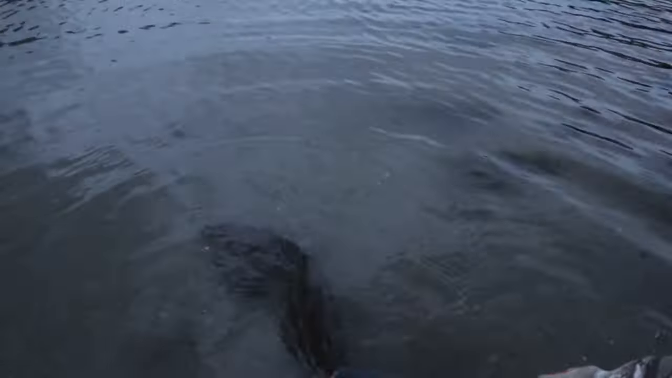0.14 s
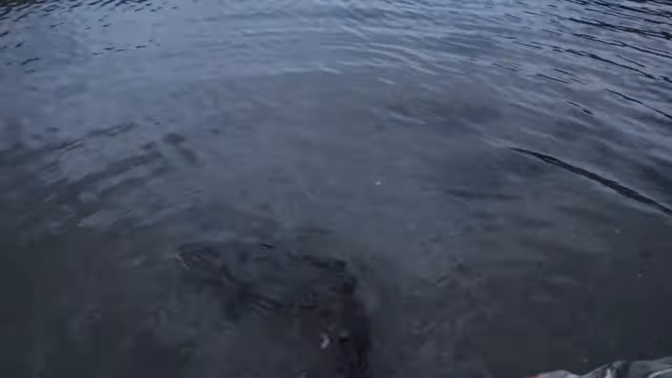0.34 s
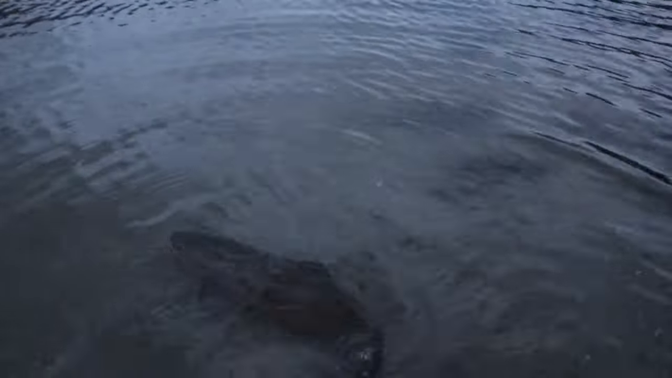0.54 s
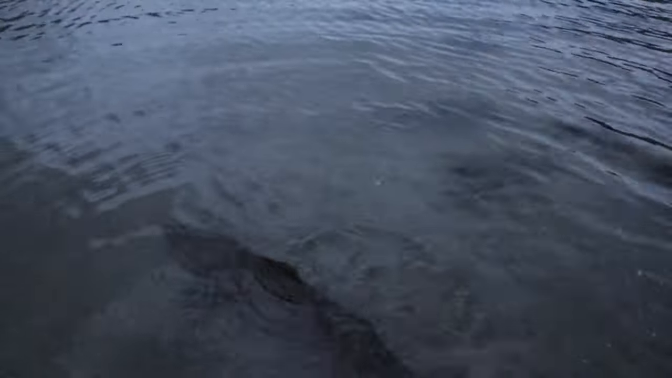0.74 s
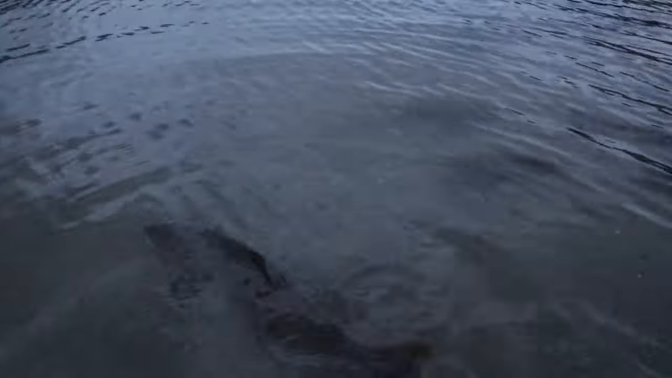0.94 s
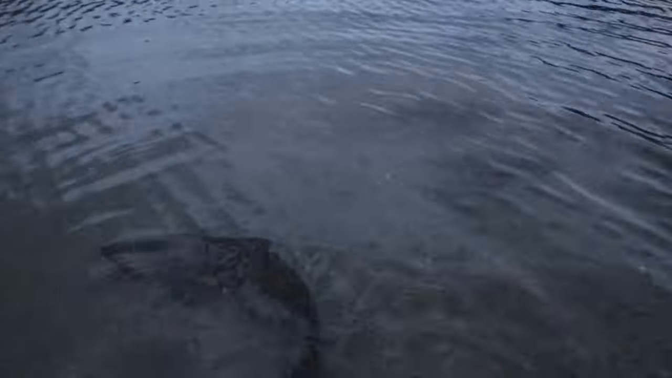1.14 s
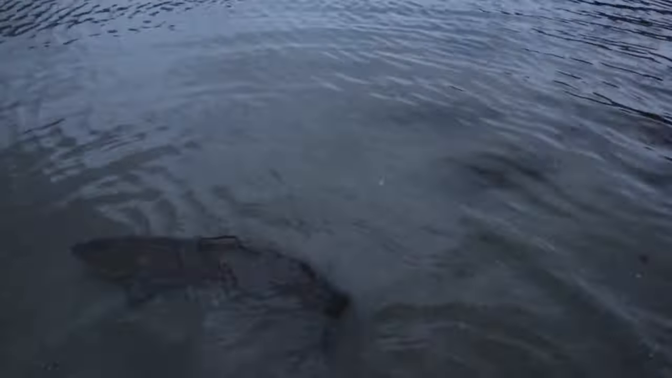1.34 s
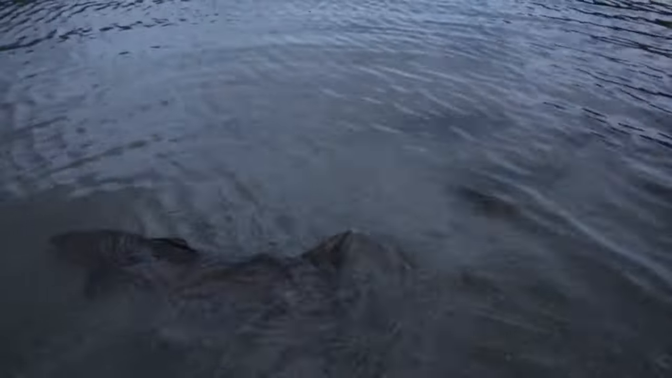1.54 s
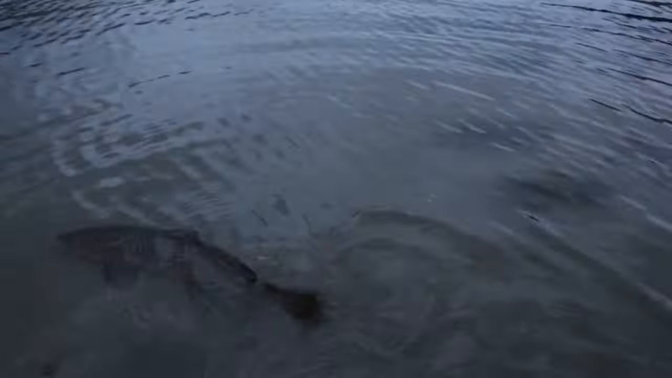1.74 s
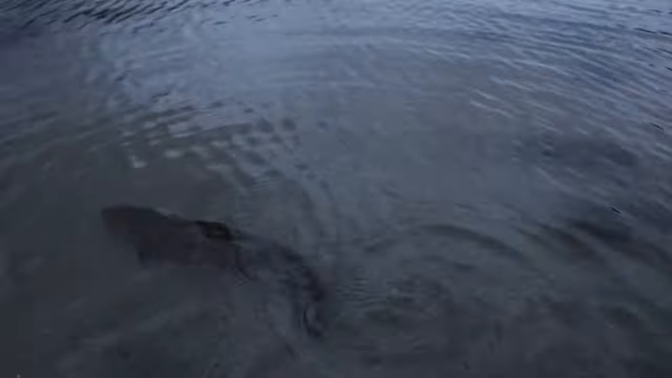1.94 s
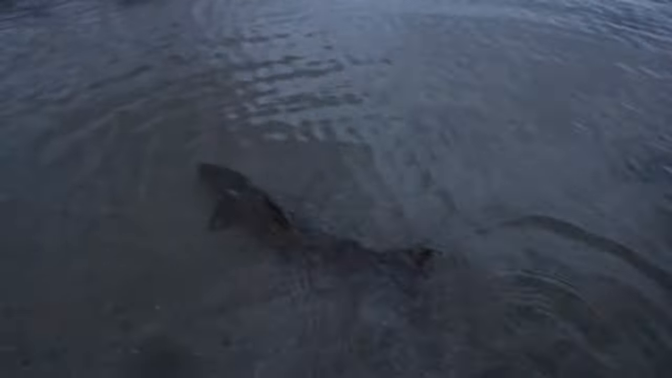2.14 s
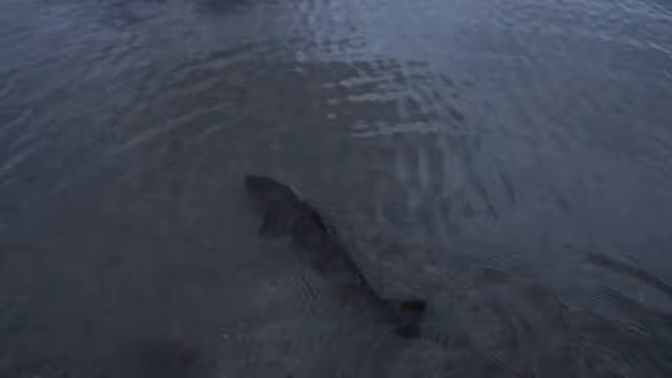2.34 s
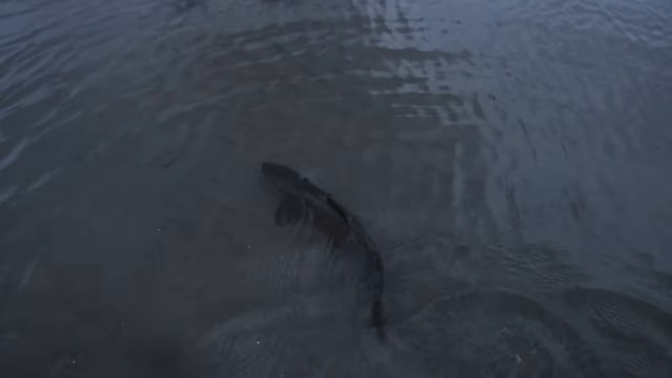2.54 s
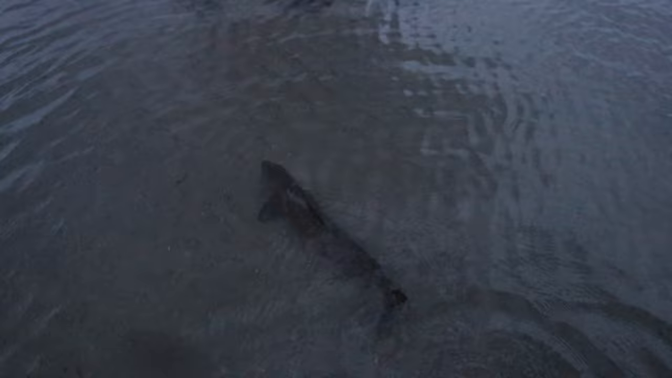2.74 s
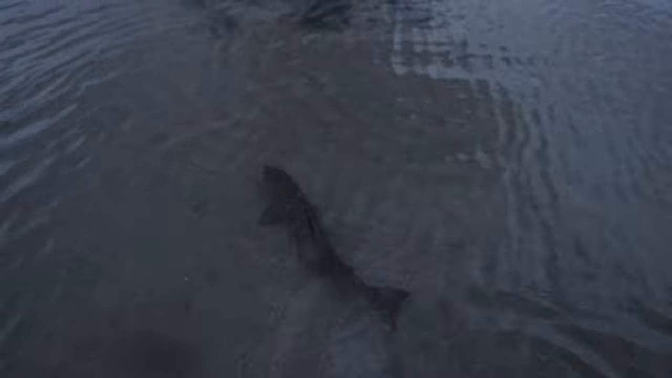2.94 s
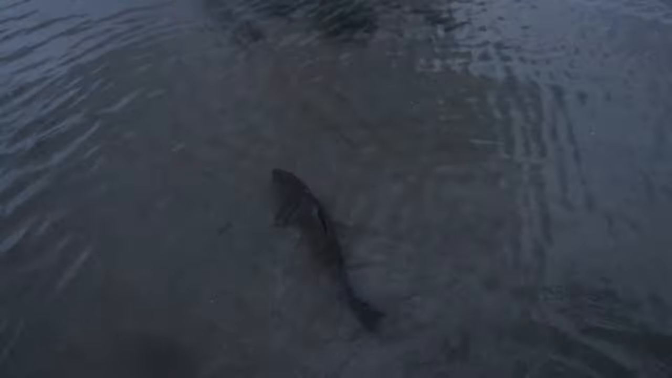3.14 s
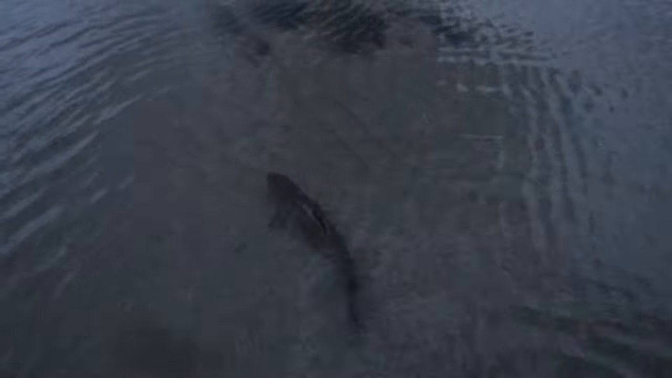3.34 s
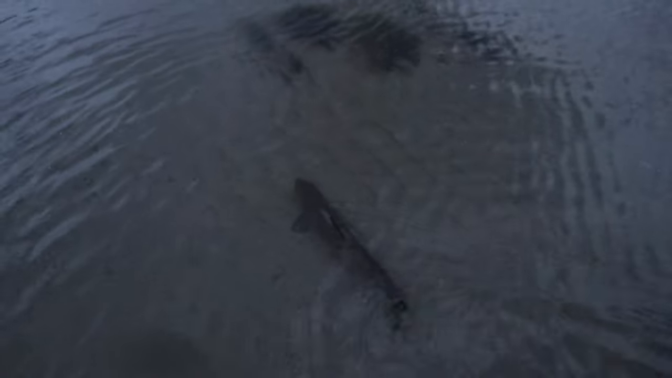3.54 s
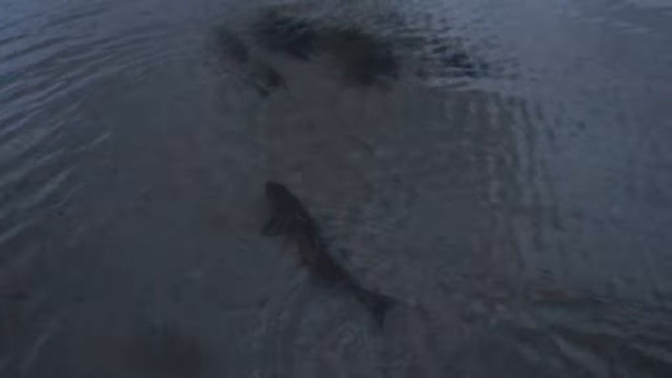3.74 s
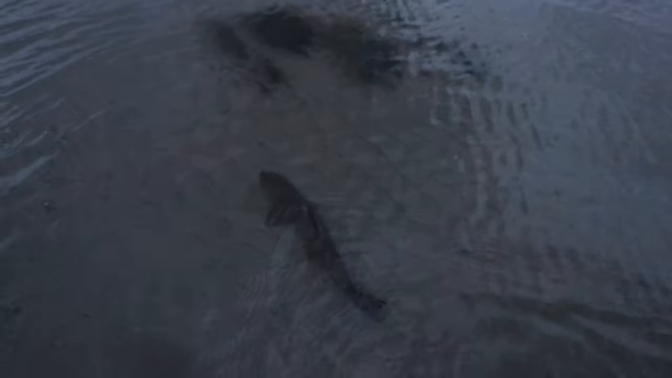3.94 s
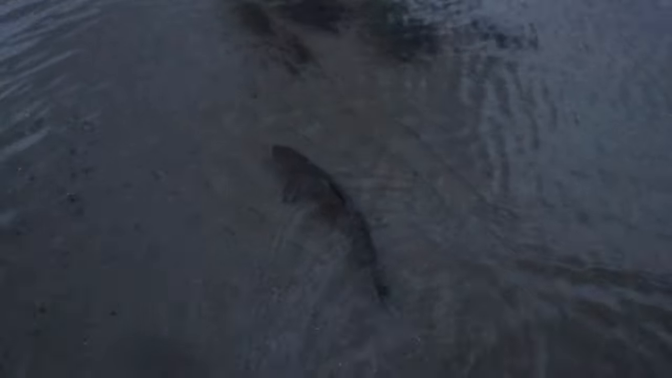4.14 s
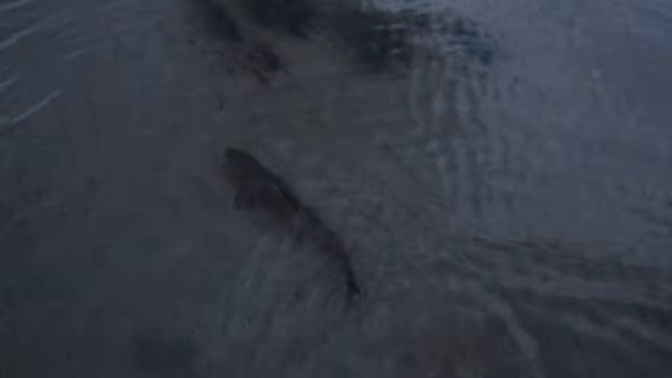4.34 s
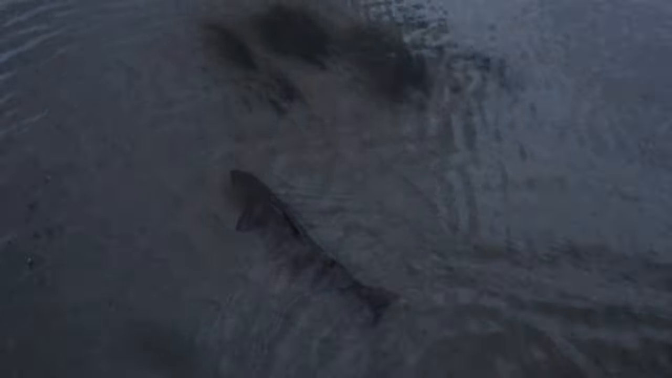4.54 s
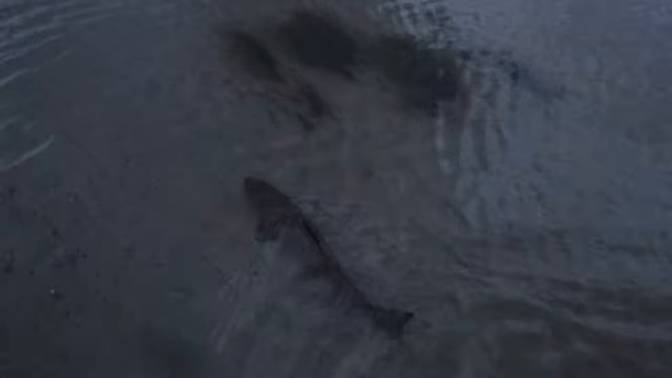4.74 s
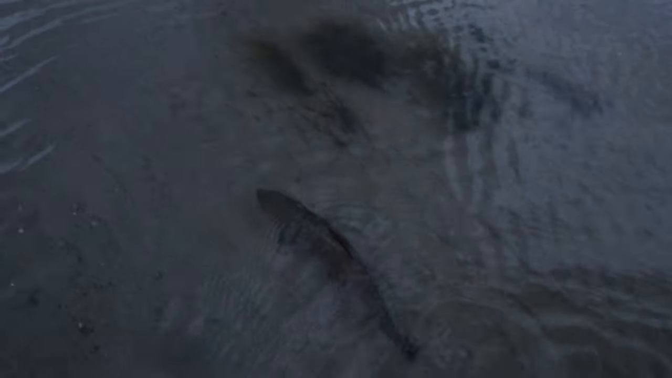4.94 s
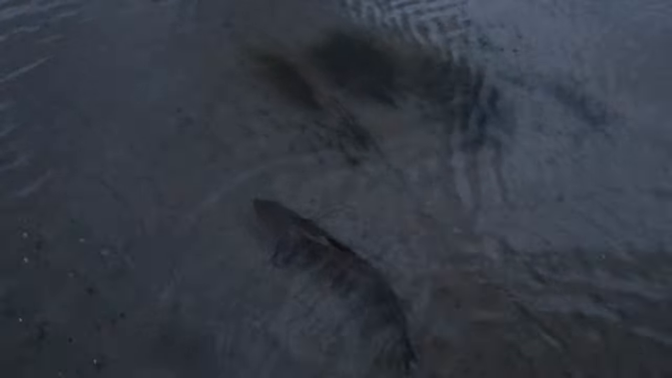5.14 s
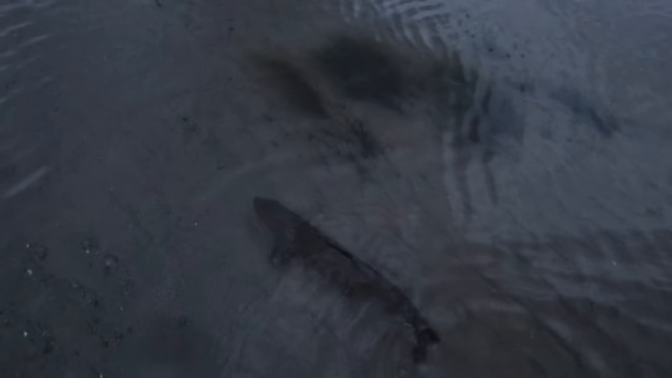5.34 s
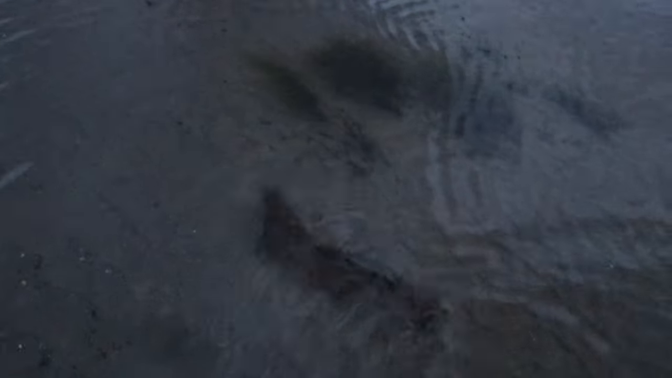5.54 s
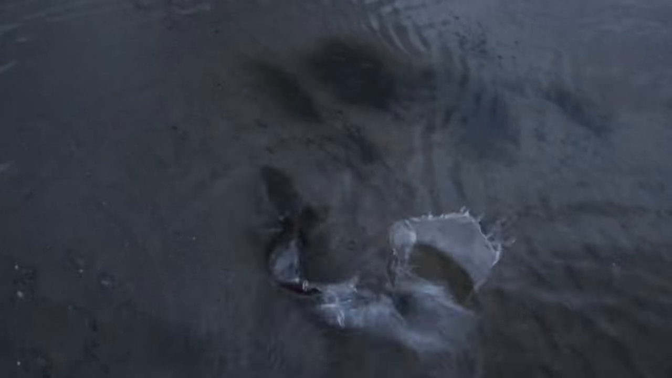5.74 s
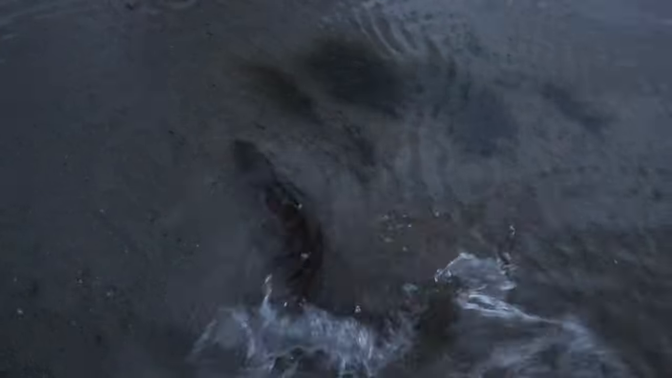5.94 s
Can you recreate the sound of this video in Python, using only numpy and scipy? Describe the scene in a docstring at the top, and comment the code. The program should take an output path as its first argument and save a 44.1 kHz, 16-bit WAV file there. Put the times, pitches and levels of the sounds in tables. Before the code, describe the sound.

Close at a quiet lake shore, low wind buffets bump the microphone while drops tick and plink into the shallows. The drips grow denser, then soft bubbly sloshes and rounded gulps take over as a fish moves. Near the end it kicks with a loud, hollow splash. Faint lapping continues behind, in wide stereo.

```python
"""Calm lake shore, close by the shallows: water drips from wet hands and sleeves, each drop a tick and a bubble.
Wind buffets the microphone as a patter of pressure lumps; lapping behind it is steady shaped noise.
Feet slosh through the water, made of crowds of short bubbles, and air pockets gulp as gliding tones.
At the end a released fish kicks away with a splash, louder in the same bubbles and gulps.
The two ports of the microphone differ in arrival time and level; late on, the high treble drops away."""
import sys
import numpy as np
from scipy import signal
from scipy.fft import rfft, irfft
from scipy.io import wavfile
from scipy.ndimage import map_coordinates

SR = 44100
rng = np.random.default_rng(int(sys.argv[2]) if len(sys.argv) > 2 else 0)


def transcribe(signal):
    """Save signal, clipped to [-1, 1], as a 16-bit WAV file at the path in sys.argv[1]."""
    frames = np.atleast_2d(signal).T
    limited = np.clip(frames, -1, 1)
    pcm = np.round(limited * 32767).astype(np.int16)
    wavfile.write(sys.argv[1], SR, pcm)


N = 264600  # 6 s

# Far lapping, spectrum: f/Hz, level/dB
HUSH = [(24, -34.5), (40, 16), (577, 5), (2390, 5), (3560, -2.5), (4920, -0.5), (7910, -22.5), (11200, -3),
        (12700, -23), (15500, -35.5)]
HUSH_DB = -55

# Gusts on the microphone: start t/s, hold/s, level/dB
GUSTS = [(0.026, 0.03, -32), (0.191, 0.037, -22), (0.309, 0.02, -29), (0.424, 0.05, -17.5),
         (0.54, 0.033, -30.5), (0.61, 0.078, -23.5), (0.739, 0.039, -26), (0.815, 0.082, -19.5),
         (1.119, 0.026, -36), (1.346, 0.048, -31.5), (1.542, 0.0024, -19.5), (1.596, 0.085, -19.5),
         (1.72, 0.12, -25.5), (2.125, 0.06, -25), (2.49, 0.0099, -23), (2.581, 0.024, -27),
         (3.299, 0.097, -24), (3.425, 0.044, -14.5), (3.521, 0.062, -22.5), (3.638, 0.032, -38),
         (3.878, 0.067, -29.5), (4.11, 0.042, -29.5)]
GUST_RISE_DB_PER_S, GUST_FALL_DB_PER_S = 574, 541
# Breeze under the gusts: t/s, level/dB
BREEZE = [(0, -34.5), (.85, -33.5), (1.0, -49.5), (1.5, -92), (1.85, -31), (2.0, -35.5), (2.2, -32),
          (2.4, -45.5), (2.65, -35), (2.78, -68), (3.15, -66), (3.5, -59), (4.1, -37), (4.3, -57.5),
          (6, -46)]
# Hardest single buffets: t/s, level/dB, f/Hz
BUFFETS = [(0.041, -14.5, 183), (0.163, -19.5, 228), (0.189, -16.5, 367), (0.217, -9.5, 402),
           (0.29, -18, 850), (0.427, -15.5, 446), (0.4739, -9, 256), (0.55, -19.5, 216), (0.61, -21, 285),
           (0.63, -16, 230), (0.657, -15.5, 327), (0.748, -16, 325), (0.819, -9.5, 413), (0.8558, -11, 380),
           (0.878, -10.5, 507), (0.892, -7, 280), (1.391, -17, 248), (1.536, -7, 410), (1.588, -17, 320),
           (1.631, -9, 264), (1.726, -13, 282), (1.787, -12.5, 260), (2.14, -13, 245), (2.482, -10, 257),
           (2.587, -20, 262), (3.198, -24, 735), (3.297, -18.5, 314), (3.339, -16.5, 161),
           (3.412, -11, 248), (3.423, -11.5, 312), (3.462, -14, 280), (3.449, -26, 265), (3.506, -15, 264),
           (3.644, -29, 153), (3.926, -18, 650)]
# Spectrum of the eddies: f/Hz, level/dB
BUFFET_COLOUR = [(15, -39.5), (25, -7.5), (91, 2.5), (257, 8.5), (312, 6), (578, 2.5), (954, 3), (1910, 23),
                 (2500, -51), (3250, -70), (5500, -120)]
# Deepest rumble of the wind, relative: t/s, level/dB
RUMBLE = [(0, -2), (2.7, -6), (3.1, 8.5), (4.8, -5.5), (5.3, -0.5)]
WIND_LAG_MS = 0.22  # the eddies reach the left port later

# Where the water lies as the camera turns: t/s, lag of the left port/ms
BEARING = [(0, 0.035), (3.8, 0.051), (3.95, 0.21), (4.25, 0.079), (4.5, 0.057), (4.9, 0.071), (5.15, -0.2),
           (5.65, -0.2), (5.74, 0.087), (5.9, -0.048), (6, -0.018)]

# Pushes of water: start t/s, hold/s, glug level/dB, gurgle level/dB, fizz level/dB
SLOSHES = [(3.167, 0.095, -46.5, -35, -42), (3.357, 0.078, -29, -46, -55), (3.431, 0.097, -51, -41.5, -53),
           (3.659, 0.086, -44.5, -43, -45.5), (3.925, 0.0048, -59, -36, -77), (4.077, 0.014, -33, -32, -59),
           (4.132, 0.19, -43, -34.5, -40.5), (4.338, 0.15, -57, -41, -41.5),
           (4.657, 0.16, -47.5, -42, -39.5), (4.972, 0.017, -34.5, -35, -74), (5.059, 0.18, -47, -35, -59),
           (5.338, 0.12, -47, -40.5, -37.5), (5.541, 0.03, -34.5, -29.5, -31.5),
           (5.762, 0.02, -37, -27, -31.5), (5.833, 0.011, -16, -23, -37), (5.897, 0.16, -28, -35, -40.5)]
SLOSH_RISE_DB_PER_S, SLOSH_FALL_DB_PER_S = 336, 165
SPRAY_DB = -7  # finest spray, against the fizz
# Water at rest, level/dB of: glug, gurgle, fizz, spray
CALM_DB = [-57.5, -58, -94, -56]
# Bubbles of glug, gurgle, fizz, spray:
# lowest f/Hz, highest f/Hz, typical length/cycles, extreme pitch ratio, rate/(1/s), mean size spread/dB
CROWDS = [(280, 808, 5.45, 1.71, 490, 5), (560, 1800, 13.8, 1.437, 1100, 5), (2000, 7290, 20, 1.4, 4000, 7),
          (7620, 13000, 8.7, 0.27, 1100, 7.5)]
# Countless tiny drops falling back, spectrum: f/Hz, level/dB
WASH = [(150, -21.5), (500, 5.5), (1500, -4.5), (2700, -4.5), (5200, -20.5), (9000, -16.5)]
WASH_DB = -6.5  # against the gurgle
# Small stray drops: t/s, level/dB
STRAYS = [(0, -59.5), (.9, -54.5), (1.2, -59.5), (2.8, -48.5), (3.9, -48.5), (5.2, -50.5), (6, -39.5)]
# Bubbles of the stray drops: one row with the columns of CROWDS
STRAY_SIZES = (1300, 10000, 24, 1.313, 130, 2.4)

# Drops and gulps, each a tick and one ringing bubble:
# t/s, bubble level/dB, settled f/Hz, last f/Hz near the surface, ring/s, tick level/dB, left over right/dB
DRIPS = [(0.282, -18.5, 1245, 1200, 0.033, -14.5, -1), (0.291, -14.5, 797, 826, 0.023, -12, 0.5),
         (0.344, -31.5, 4700, 4550, 0.0053, -19.5, 0), (0.554, -37, 2380, 2570, 0.023, -56, 0),
         (0.9675, -42.5, 2120, 2110, 0.0087, -37, 24), (0.983, -31, 4600, 4530, 0.0076, -44, 3),
         (1.028, -32, 3800, 3920, 0.007, -32, -11), (1.033, -21.5, 2300, 2700, 0.0071, -28.5, 10.5),
         (1.083, -39, 1280, 1685, 0.015, -28, 1), (1.164, -31, 1640, 2100, 0.017, -26, 6),
         (1.197, -32, 1900, 1900, 0.015, -34, 0), (1.2937, -23, 1860, 1890, 0.0071, -19, 3),
         (1.311, -37, 1520, 1550, 0.017, -57, 1), (1.353, -36.5, 3080, 4000, 0.012, -48, 4),
         (1.374, -35, 1730, 1800, 0.02, -55, 3), (1.4007, -79, 2630, 2520, 0.008, -35, -37),
         (1.4268, -27.5, 1690, 1670, 0.021, -25, 2), (1.457, -32.5, 1385, 1390, 0.033, -51, 2),
         (1.558, -23, 5650, 5850, 0.0071, -24, -16), (1.558, -37, 2540, 2500, .012, -60, 5),
         (1.567, -38, 3700, 3700, .01, -45, 3), (1.644, -32.5, 4050, 4000, 0.009, -38, 2),
         (1.679, -39, 3900, 3800, .009, -50, 3), (1.588, -29.5, 3330, 3580, 0.0044, -24, 6),
         (1.6137, -35, 6000, 6020, 0.0063, -48, -3.5), (1.621, -29, 4470, 4700, 0.0069, -43, 5),
         (1.723, -25.5, 2580, 2460, 0.011, -23, 3), (1.749, -29, 5800, 6180, 0.0097, -53, 1),
         (1.7856, -14.5, 3160, 3220, 0.0026, -15.5, 7), (1.817, -50, 1850, 1810, 0.018, -36, 28),
         (1.8564, -26, 1224, 5130, 0.037, -26, 1), (1.8996, -30, 1140, 1140, 0.059, -18.5, 1),
         (2.124, -11.5, 1940, 2730, 0.0047, -13, 1), (2.1455, -24, 1250, 1520, 0.03, -22, 2),
         (2.16, -32, 2900, 3000, 0.022, -30, -2), (2.168, -37, 2040, 2070, 0.029, -19, 8),
         (2.206, -19.5, 1750, 1670, 0.013, -19.5, 5), (2.2628, -21.5, 2150, 2220, 0.0087, -22, 1),
         (2.424, -25, 1920, 2000, 0.013, -51, 5), (2.434, -25.5, 1090, 1070, 0.042, -47, 3),
         (2.4554, -18, 4080, 4050, 0.0064, -9, 2.5), (2.494, -27.5, 2670, 2700, 0.012, -41, -9),
         (2.5173, -31.5, 4450, 4800, 0.0088, -58, -1), (2.5472, -23.5, 3770, 3900, 0.0076, -25, 10.5),
         (2.563, -31.5, 1270, 1250, 0.02, -53, 3), (2.597, -17, 3810, 3450, 0.0054, -14, 2),
         (2.604, -24, 6300, 6700, 0.016, -43, 1), (2.611, -30, 1250, 1510, 0.031, -46, 5),
         (2.634, -28, 895, 2030, 0.035, -21, 0), (2.668, -27, 940, 1000, 0.042, -23, 3),
         (2.693, -28, 1740, 1770, 0.022, -49, 6), (2.6958, -26, 3700, 4120, 0.016, -16, -2),
         (2.716, -25.5, 1840, 1890, 0.021, -45, 4), (2.7158, -25, 5050, 5100, 0.016, -13.5, 4.5),
         (2.901, -26, 1120, 1050, 0.031, -16, 1), (2.912, -19.5, 5600, 6500, 0.0027, -54, 18),
         (2.955, -39, 596, 1720, 0.048, -60, -6), (2.9896, -28.5, 3880, 3680, 0.016, -49, 3),
         (3.0032, -32.5, 825, 1480, 0.05, -16.5, 4), (3.075, -27.5, 1980, 1900, 0.017, -16.5, 0),
         (3.1, -30, 3870, 4060, 0.016, -48, 3), (3.113, -24, 1290, 1280, 0.0078, -41, -5),
         (3.125, -24, 2730, 3170, 0.016, -9.5, -3), (3.136, -28, 880, 1250, 0.012, -60, -3),
         (3.2, -25.5, 686, 1430, 0.031, -18.5, -6), (3.2596, -28, 955, 940, 0.035, -15, -10.5),
         (3.3539, -31, 2800, 2840, 0.0064, -13, 5.5), (3.372, -27, 1240, 1610, 0.023, -24, 9),
         (3.4497, -18.5, 1540, 1480, 0.0097, -38, -17), (3.511, -28.5, 2340, 2460, 0.011, -23, -8),
         (3.6439, -25, 1013, 1120, 0.031, -51, -1), (3.7125, -18.5, 2050, 2370, 0.0051, -11.5, -1),
         (3.743, -31, 2950, 2820, 0.012, -12, -2), (3.8524, -22, 4130, 4310, 0.0073, -22.5, -2),
         (3.913, -20.5, 2670, 2600, 0.0082, -6.5, -3), (3.9291, -27, 7170, 7550, 0.0048, 2, -7.5),
         (4.043, -17.5, 950, 955, 0.013, -39, 5), (4.063, -22.5, 1300, 1420, 0.012, -26, 7),
         (4.065, -9.5, 450, 450, 0.012, -46, -5), (4.103, -20, 1150, 1160, 0.029, -37, 14),
         (4.132, -11, 330, 447, 0.0027, -60, -4), (4.1656, -37, 1600, 1680, 0.018, -27.5, 32),
         (4.4326, -19, 2010, 2070, 0.012, -8, -8), (4.472, -20, 975, 1010, 0.0084, -42, 2),
         (4.74, -10, 1174, 1770, 0.0077, -18.5, -7), (4.7549, -25.5, 2260, 2350, 0.023, -39, 1),
         (4.769, -23, 1580, 2220, 0.01, -32, -6), (4.81, -25, 1690, 1820, 0.022, -9.5, -5),
         (4.831, -31, 5060, 4930, 0.014, -11.5, -1), (4.905, -29, 6000, 5650, 0.01, -46, -8),
         (5.1125, -23.5, 1310, 1490, 0.0063, -34, 25), (5.1314, -22, 1520, 1550, 0.02, -38, 1),
         (5.352, -25.5, 2040, 2200, 0.014, -40, 4), (5.501, -56, 1860, 2090, 0.005, -17, 3),
         (5.536, -22.5, 1160, 1224, 0.013, -50, 6), (5.5638, -15, 720, 805, 0.0076, -30, -25),
         (5.661, -30, 790, 780, 0.055, -53, -18), (5.7431, -9.5, 350, 302, 0.0099, -4.5, -6),
         (5.7695, -9.5, 1300, 1480, 0.01, -43, -16), (5.8408, -13, 3500, 3800, 0.011, -24, -1),
         (5.8916, -3, 730, 756, 0.0065, -50, -19), (5.91, -16, 935, 955, 0.0027, -58, -19),
         (5.942, -25, 4850, 5030, 0.0074, -24, 3), (5.96, -20, 3970, 4170, 0.011, -48, 2)]

# Air pockets that swell and glide as the water closes over them: t/s, level/dB, first f/Hz, last f/Hz, length/s
GULPS = [(2.667, -30, 1300, 1770, 0.015), (3.107, -38, 935, 1570, 0.03), (3.199, -37.5, 245, 690, 0.071),
         (3.27, -33.5, 1530, 2070, 0.021), (3.34, -44, 924, 1170, 0.035), (3.503, -38, 1100, 1220, 0.029),
         (3.538, -39, 1660, 2550, 0.019), (3.705, -30.5, 340, 290, 0.025), (4.031, -22, 790, 850, 0.0097),
         (4.105, -28.5, 371, 560, 0.034), (4.17, -27, 642, 710, 0.044), (4.188, -34, 1090, 1250, 0.011),
         (4.215, -32, 265, 534, 0.083), (4.267, -32, 1110, 1030, 0.024), (4.286, -26, 606, 930, 0.032),
         (4.308, -31.5, 985, 1250, 0.051), (4.322, -24, 650, 640, 0.016), (4.396, -37, 742, 740, 0.045),
         (4.432, -24, 984, 1030, 0.0098), (4.583, -33, 3460, 3830, 0.0075),
         (4.892, -36.5, 1600, 1690, 0.016), (4.929, -33.5, 2000, 2370, 0.006),
         (4.954, -14, 1025, 1090, 0.0082), (4.97, -3.5, 670, 870, 0.0084), (5.005, -26.5, 540, 637, 0.022),
         (5.013, -27, 990, 1020, 0.022), (5.036, -27.5, 885, 830, 0.019), (5.041, -25, 1220, 1230, 0.0096),
         (5.065, -27.5, 461, 990, 0.062), (5.087, -33, 1520, 1560, 0.018), (5.164, -25.5, 950, 1190, 0.013),
         (5.19, -23, 1030, 1870, 0.0186), (5.111, -28, 851, 940, 0.023), (5.692, -25.5, 600, 666, 0.04),
         (5.745, -16.5, 239.3, 622, 0.095), (5.758, -16, 924, 1540, 0.024), (5.784, -10, 960, 1114, 0.0048),
         (5.822, -22, 2300, 1770, 0.014), (5.834, -17, 618, 690, 0.012), (5.835, -3, 766, 910, 0.02),
         (5.875, -16, 698, 895, 0.016), (5.886, -4.5, 687, 870, 0.0034), (5.937, -29, 725, 844, 0.013),
         (5.968, -14, 262, 320, 0.0082), (5.988, -21.5, 373, 473, 0.018)]
GULP_PEAK, GULP_BEND, GULP_WOBBLE = 0.44, 1.2, 0.73  # how early it peaks, how late it glides, unevenness
GULP_WIDTH = 0.19  # delayed share, opposite in the two ports, which widens the gulps
BANK_DB = -8  # scatter of drops and gulps from body and bank

# Microphone response: f/Hz, level/dB
MICROPHONE = [(60, -3), (5500, -1.5), (8000, -4), (10500, -1.5), (12500, -2.5), (14500, -24), (16300, -42)]
# Stereo widening, gain of the side signal: f/Hz, level/dB
SIDE_LIFT = [(300, -16.5), (1500, -2.5), (4000, 5), (9000, 5), (15000, -3.5)]
SHUT_S, SHUT_HZ = 5.23, 6930  # from this moment the treble above this pitch is nearly gone
EDGE_HZ = 16400  # upper limit of the band


def gain_of(db):
    """Amplitude factor for a level in dB."""
    return 10 ** (np.asarray(db) / 20)


def evened(x):
    """Scales a signal to unit RMS."""
    return x / np.sqrt(np.mean(x ** 2) + 1e-20)


def coloured(x, points):
    """Filters by a spectrum drawn on a log-frequency axis."""
    f, db = np.transpose(points)
    hz = np.fft.rfftfreq(N, 1 / SR)
    gain = gain_of(np.interp(np.log(hz + 1), np.log(f + 1), db))
    return irfft(rfft(x) * gain, N)


def passed(x, order, hz, kind="high"):
    """Butterworth filter with its corner or corners in Hz."""
    return signal.lfilter(*signal.butter(order, hz, kind, fs=SR), x)


def curves(rows):
    """Draws each column against time, one value per sample."""
    s, *columns = np.transpose(rows)
    return [np.interp(np.arange(N) / SR, s, c) for c in columns]


def add(mix, s, sound):
    """Lays a sound into the mix at a moment, cut at the end."""
    part = mix[..., round(s * SR):][..., :sound.shape[-1]]
    part += sound[..., :part.shape[-1]]


def sprinkle(shapes, per_s, spread_db):
    """Scatters the shapes at random moments; a few are large."""
    size = gain_of(spread_db * np.minimum(rng.exponential(1, N), 4))
    size = size * rng.choice([-1., 1.], N)
    struck = rng.random(N) < per_s / SR
    which = np.where(struck, rng.integers(0, len(shapes), N), -1)
    layers = (signal.oaconvolve(size * (which == k), shape)[:N] for k, shape in enumerate(shapes))
    return evened(sum(layers))


def surges(start, hold, db, rise_db_per_s, fall_db_per_s, rest_db):
    """Level in dB of events that rise, hold and fall over a resting level; their powers add."""
    t = np.arange(0, N + 64, 64) / SR
    early = np.maximum(start[:, None] - t, 0)
    late = np.maximum(t - (start + hold)[:, None], 0)
    event_db = db[:, None] - rise_db_per_s * early - fall_db_per_s * late
    power = gain_of(2 * event_db).sum(0)
    return 10 * np.log10(np.interp(np.arange(N) / SR, t, power) + gain_of(2 * rest_db))


def bubble(t, hz, ring_s, rise, settle=.6, fade_db=28.0, late=3.0):
    """Pinched off sharp, the pitch settles in a millisecond or two, then glides towards the surface."""
    u = np.clip(t / ring_s, 0, 1)
    pitch = hz * (1 + settle * np.exp(-np.maximum(t, 0) / 0.0006)) * rise ** (u ** late)
    turns = np.cumsum(pitch) / SR + hz * (t[0] + 0.001016)
    swell = np.clip(t * hz / 0.18, 0, 1)  # builds up within its first cycle
    held = max(rise, 1) ** 2  # a climbing bubble nears the air and keeps its loudness
    shape = swell * gain_of(-fade_db * u / held) * np.clip(6 * (1 - u), 0, 1)
    return shape * np.sin(2 * np.pi * turns)


def hush():
    """Distant lapping and air: steady shaped noise, with a treble that differs between the ports."""
    a, b = (gain_of(HUSH_DB) * evened(coloured(z, HUSH)) for z in rng.standard_normal((2, N)))
    return a + passed(b, 1, 970.0) * [[1], [-1]]


def lump(hz):
    """One eddy pushes the membrane in and lets it swing back."""
    u = np.arange(-400, 400) / SR * hz * np.pi
    return (1 - 2 * u ** 2 + 0.43 * u) * np.exp(-u ** 2)


def wind():
    """A random patter of eddies rides the gust; stronger gusts make smaller, brighter eddies."""
    breeze_db, = curves(BREEZE)
    rumble_db, = curves(RUMBLE)
    gust_db = surges(*np.transpose(GUSTS), GUST_RISE_DB_PER_S, GUST_FALL_DB_PER_S, breeze_db)
    patter = sprinkle([lump(f) for f in np.geomspace(180, 900, 10)], 750, 3.4)
    filled = coloured(patter, [(30, 14.0), (200, 4.5), (500, 8.5), (1200, -10.0), (3000, -53.5)])
    eddies = evened(coloured(filled, BUFFET_COLOUR))
    dull = evened(passed(eddies, 2, [3.5, 158.0], "band"))
    bright = np.clip((gust_db + 51) / 28, 0, 1) ** 2
    deep = (1 - 0.75 * bright) * gain_of(rumble_db) * dull
    out = gain_of(gust_db) * (bright * eddies + deep)
    for s, db, hz in BUFFETS:
        crested = lump(hz) + 0.48 * lump(1.59 * hz)
        add(out, max(s - .005, 0), gain_of(db) * crested)
    # half the lag on each port, by way of the slope
    return out - WIND_LAG_MS * SR / 2000 * np.gradient(out) * [[1], [-1]]


def stirred(low_hz, high_hz, cycles, top_rise, per_s, spread_db, settle=0.29, count=26):
    """A crowd of short bubbles between two sizes, each with its own length and glide."""
    shapes = []
    pitches = np.geomspace(low_hz, min(high_hz, 15000), count)
    for hz, (a, b) in zip(pitches, rng.random((count, 2))):
        ring_s = cycles * (0.29 + 1.783 * a) / hz
        t = np.arange(0, ring_s, 1 / SR)
        one = bubble(t, hz, ring_s, 1 + (top_rise - 1) * b, settle, late=1.44)
        shapes.append(one * np.sqrt(hz / low_hz))
    return sprinkle(shapes, per_s, spread_db)


def slosh(scatter=0.86):
    """Bubble crowds swell with each push of water; most sounds from one bearing, the rest from all around."""
    start, hold, glug, gurgle, fizz = np.transpose(SLOSHES)
    kinds_db = (glug, gurgle, fizz, fizz + SPRAY_DB)
    levels = [gain_of(surges(start, hold, db, SLOSH_RISE_DB_PER_S, SLOSH_FALL_DB_PER_S, rest_db))
              for db, rest_db in zip(kinds_db, CALM_DB)]
    near = sum(g * stirred(*kind) for g, kind in zip(levels, CROWDS))
    patter = sprinkle([np.ones(1)], 6000, 2.5)
    near += gain_of(WASH_DB) * levels[1] * evened(coloured(patter, WASH))
    near += gain_of(curves(STRAYS)[0]) * stirred(*STRAY_SIZES, settle=0.802)
    lag_ms, = curves(BEARING)
    ports = [map_coordinates(near, [np.arange(N) - side * lag_ms * SR / 2000], order=3)
             for side in (1, -1)]
    around = np.roll(near, 260)  # delayed by 6 ms
    high = passed(around, 1, 1500.0)  # long waves reach both ports alike
    return np.array(ports) + scatter * high * [[1], [-1]] + 0.31 * np.roll(high, 370)


def drips():
    """Each drop is a noisy tick and a ringing bubble, reaching one port a little before the other."""
    out = np.zeros((2, N))
    spatter = passed(rng.standard_normal((len(DRIPS), 600)), 2, 300.0)
    tick_fade = gain_of(-60 * np.arange(600) / SR / 0.0039)
    for row, noise, (a, b) in zip(DRIPS, spatter, rng.random((len(DRIPS), 2))):
        s, db, hz, last_hz, ring_s, tick_db, pan_db = row
        t = np.arange(round(ring_s * SR) + 700) / SR - .001
        lag_ms = np.interp(s, *np.transpose(BEARING))
        # slight glides run evenly, wide ones shoot up late
        bend = min(3.0, hz / 140, 1 + 2 * abs(np.log(last_hz / hz)))
        for ear, side in enumerate((1, -1)):
            late = t - side * lag_ms / 2000
            tick = np.interp(late * SR, np.arange(600), noise * tick_fade, 0, 0)
            ring = bubble(late, hz, ring_s, last_hz / hz, 0.17 + hz / 9000, late=bend)  # small start sharper
            waver = 1 + 0.42 * np.sin(2 * np.pi * (70 + 60 * a) * late + 2 * np.pi * b)  # from ripples
            drop = gain_of(db) * ring * waver + gain_of(tick_db) * tick
            add(out[ear], s - .001, gain_of(side * pan_db / 2) * drop)
    return passed(out, 2, 150.0)


def gulps():
    """Each air pocket rings as one gliding tone under a soft, uneven arch."""
    out = np.zeros((2, N))
    for (s, db, hz, last_hz, length_s), turn in zip(GULPS, rng.random(len(GULPS))):
        t = np.arange(0, length_s + .002, 1 / SR) - .001
        lag_ms = np.interp(s, *np.transpose(BEARING))
        for ear, side in enumerate((1, -1)):
            u = np.clip((t - side * lag_ms / 2000) / length_s, 0, 1)
            pitch = hz * (last_hz / hz) ** (u ** GULP_BEND) * (u > 0)
            turns = np.cumsum(pitch) / SR
            arch = np.sin(np.pi * u ** (GULP_PEAK + 1.6 * length_s))
            depth = GULP_WOBBLE * np.exp(-length_s / 0.06)  # long gulps are smoother
            wobble = 1 + depth * np.sin(2 * np.pi * (turns / 4.38 + turn))
            add(out[ear], s - .001, gain_of(db) * arch * wobble * np.sin(2 * np.pi * turns))
    out = out + GULP_WIDTH * np.roll(out.mean(0), 260) * [[1], [-1]]
    return passed(out, 2, 140.0)


def scene():
    """Sums the shore; body and bank scatter a little of the drops and gulps back."""
    drops = drips() + gulps()
    taps = rng.standard_normal((2, 3000)) * gain_of(-60 * np.arange(3000) / SR / 0.03)
    close = signal.oaconvolve(drops, taps / np.linalg.norm(taps[0]), axes=1)[:, :N]
    return drops + gain_of(BANK_DB) * close + slosh() + wind() + hush()


def record(dry):
    """Colours, widens and clips the sound, dulls it above 7 kHz from 5.23 s, then limits the band."""
    mid = coloured(dry.mean(0), MICROPHONE)
    side = coloured(coloured((dry[0] - dry[1]) / 2, SIDE_LIFT), MICROPHONE)
    wide = np.clip([mid + side, mid - side], -1, 1)
    low_pass = signal.firwin(301, SHUT_HZ, window=("kaiser", 7), fs=SR)
    dull = signal.oaconvolve(wide, low_pass[None], "same")
    shut = 0.978 * np.clip((np.arange(N) / SR - SHUT_S) / 0.0074, 0, 1)
    heard = wide + shut * (dull - wide)
    band_edge = signal.firwin(511, EDGE_HZ, window=("kaiser", 9), fs=SR)
    return signal.oaconvolve(heard, band_edge[None], "same")


dry = scene()
out = record(dry)
transcribe(out)
```